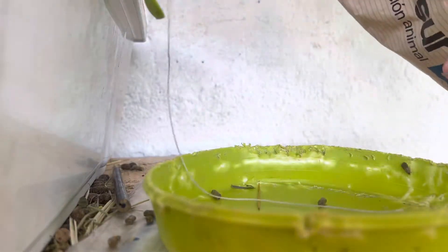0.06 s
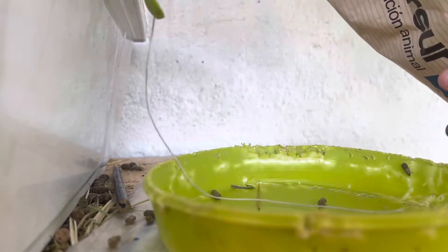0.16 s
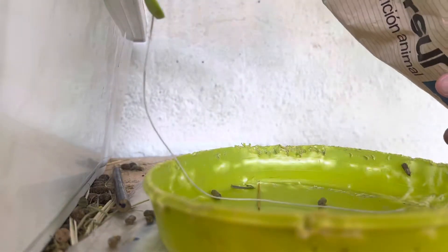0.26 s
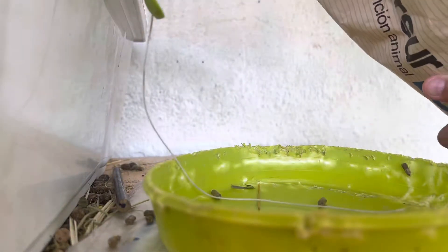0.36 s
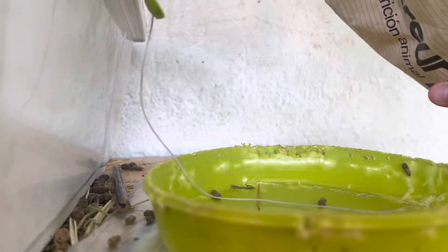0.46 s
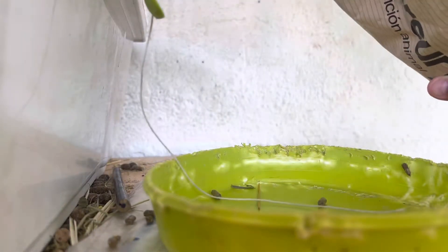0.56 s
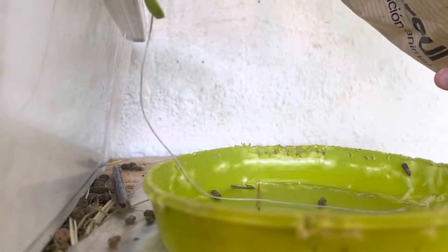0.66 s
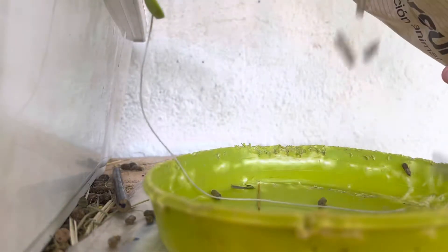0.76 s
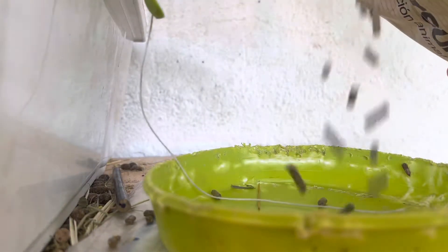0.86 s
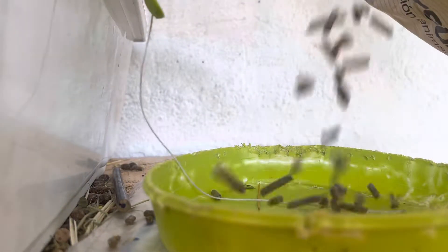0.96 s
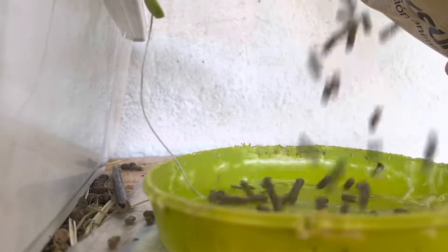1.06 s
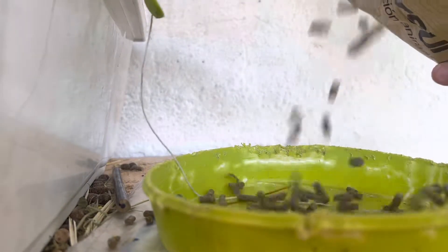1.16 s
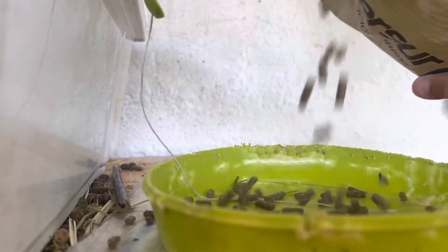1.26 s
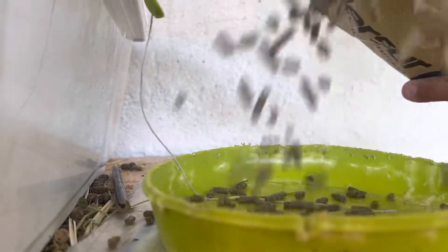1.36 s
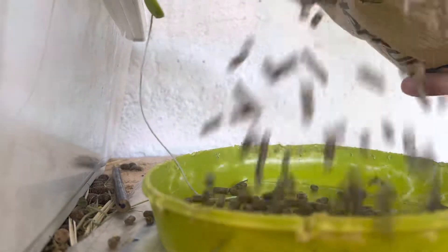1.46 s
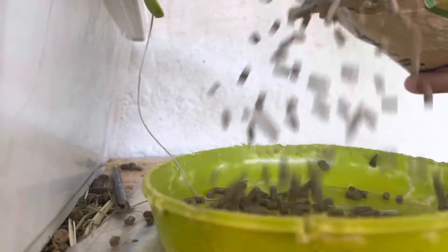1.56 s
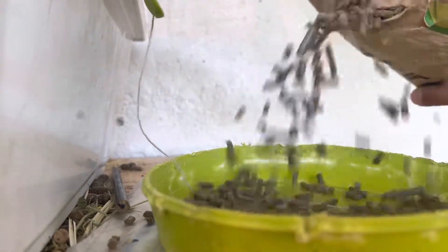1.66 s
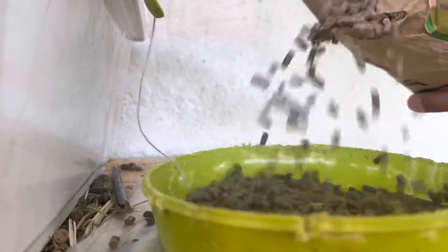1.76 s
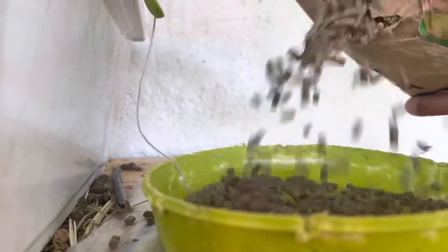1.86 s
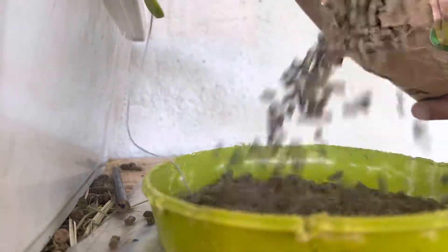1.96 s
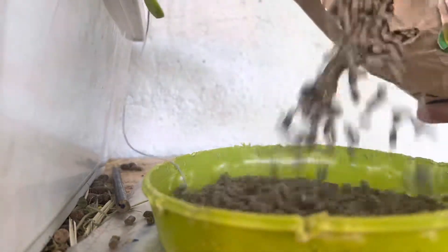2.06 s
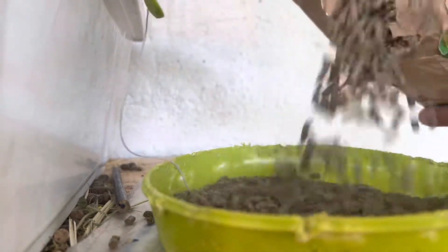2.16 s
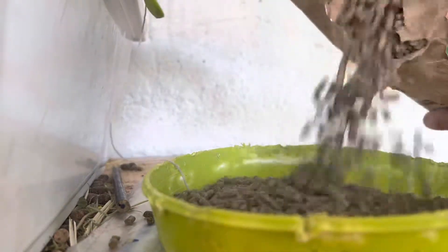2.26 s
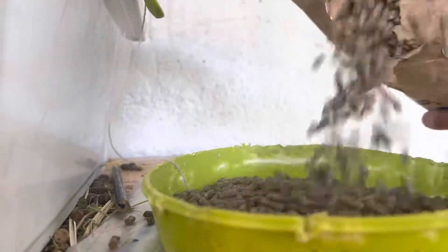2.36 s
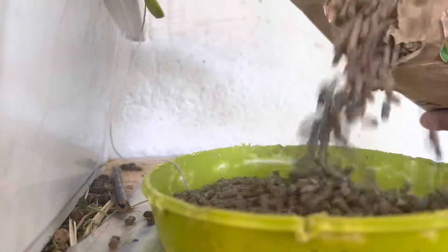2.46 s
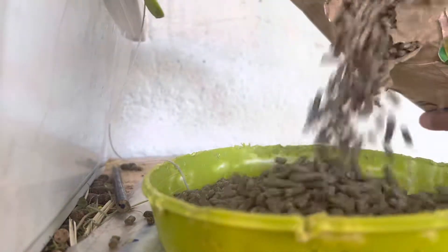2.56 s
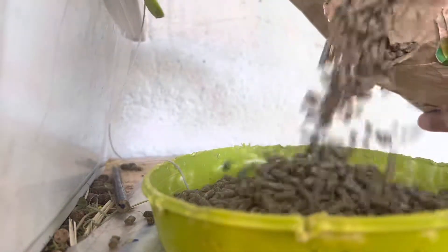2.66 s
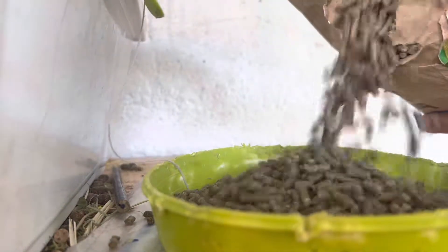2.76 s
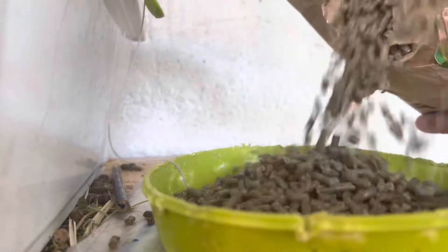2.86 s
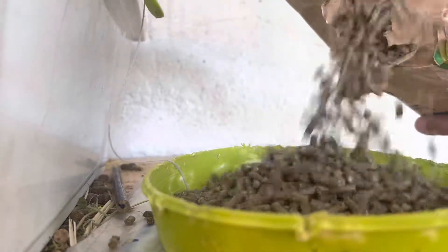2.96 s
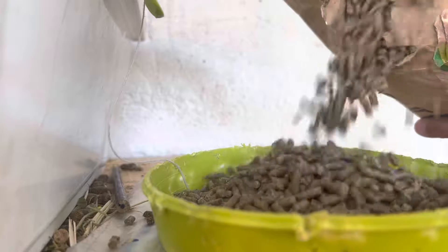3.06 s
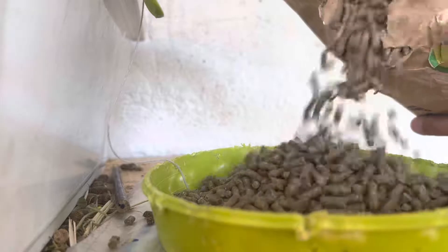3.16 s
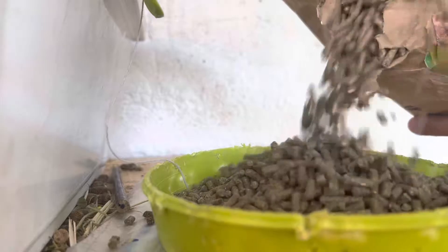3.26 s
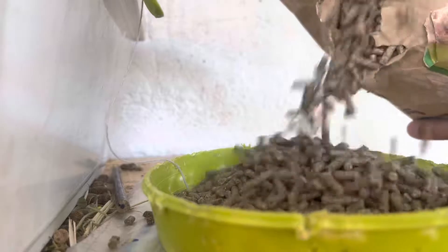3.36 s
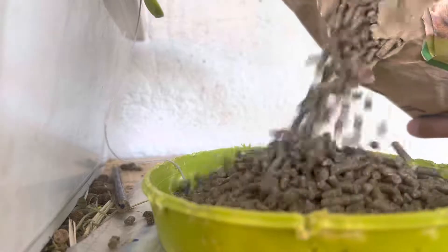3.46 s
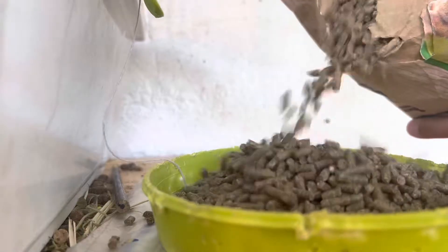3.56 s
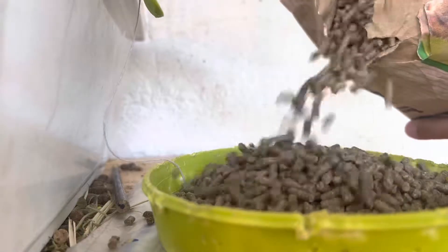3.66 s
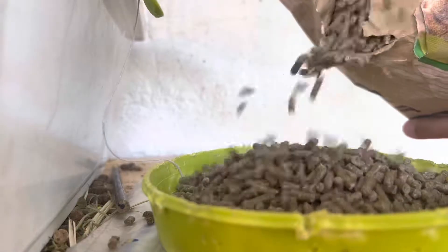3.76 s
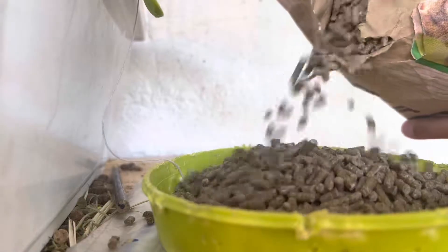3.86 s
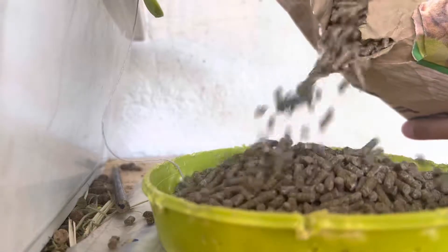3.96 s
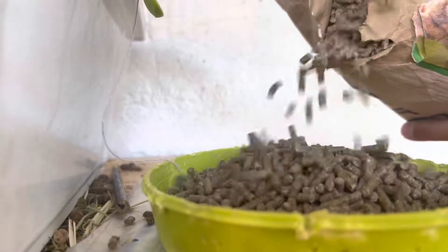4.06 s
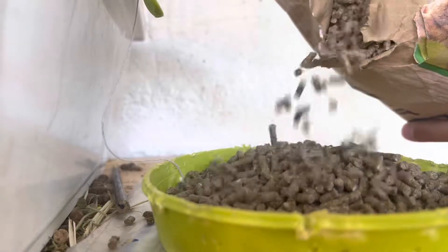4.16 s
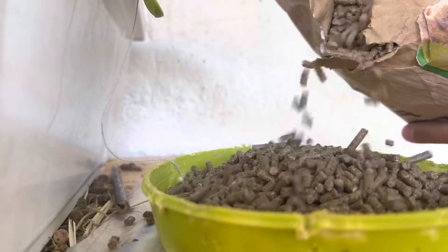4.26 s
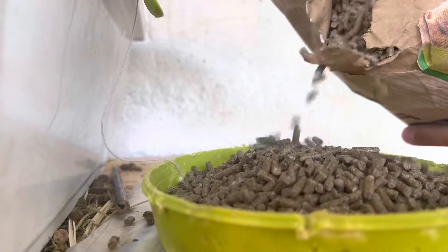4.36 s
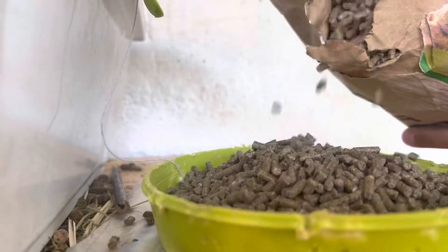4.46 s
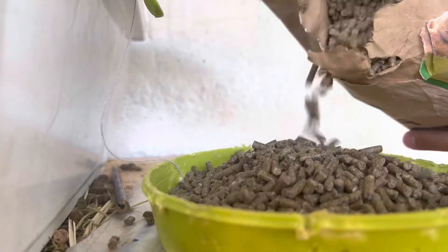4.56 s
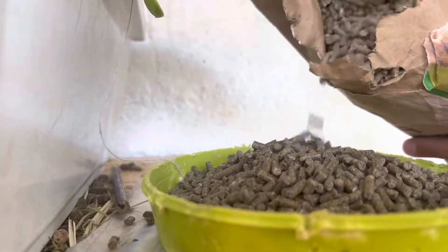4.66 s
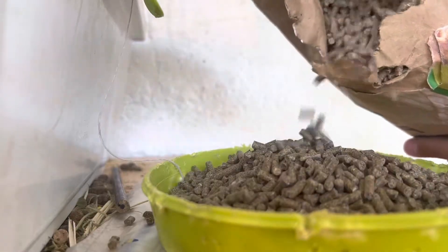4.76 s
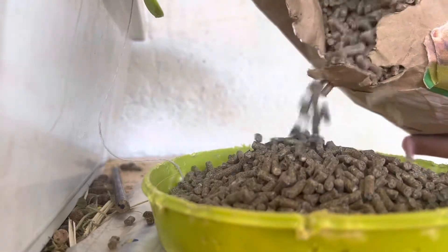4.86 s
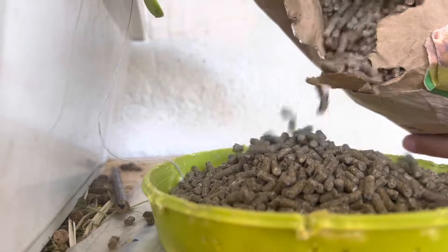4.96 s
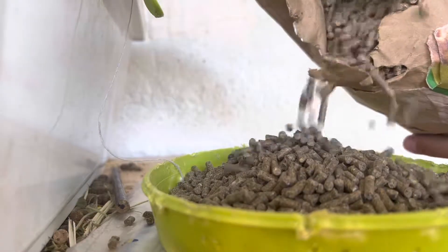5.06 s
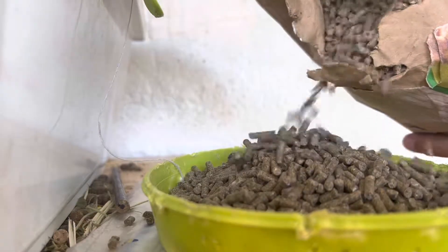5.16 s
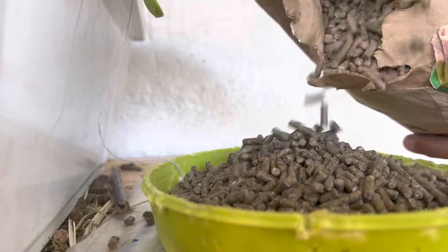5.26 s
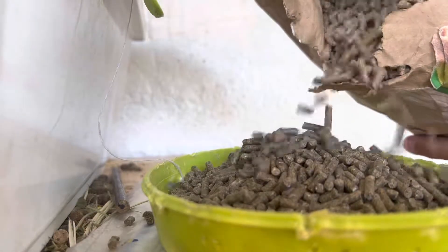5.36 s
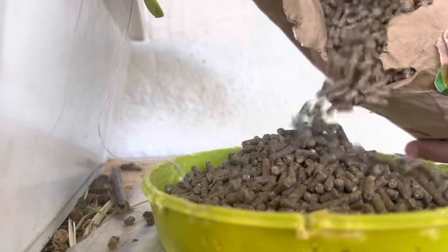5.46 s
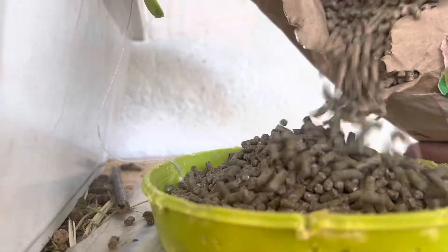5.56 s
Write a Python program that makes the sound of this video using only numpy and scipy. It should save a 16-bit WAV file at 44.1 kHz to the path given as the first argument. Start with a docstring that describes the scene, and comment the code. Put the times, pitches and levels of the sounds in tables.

```python
"""Dry feed pellets pour from a paper sack into a plastic bowl, heard close by in stereo.
Each impact is a shaped noise burst: ticks and ringing wall modes first, then duller knocks on the heap.
Loose pellets land hard on the plastic or click on the heap as the pour swells, thins and picks up again.
The sack crumples, rustles, snaps and creases; two hitches boom in its hollow through resonant modes.
Behind lie coloured noise for still air and a faint, slowly sinking sine hum."""
import sys
import numpy as np
from scipy import signal
from scipy.fft import rfft, irfft
from scipy.io import wavfile
from scipy.ndimage import uniform_filter1d

SR = 44100
rng = np.random.default_rng(int(sys.argv[2]) if len(sys.argv) > 2 else 0)


def transcribe(signal):
    """Save signal, clipped to [-1, 1], as a 16-bit WAV file at the path in sys.argv[1]."""
    frames = np.atleast_2d(signal).T
    limited = np.clip(frames, -1, 1)
    pcm = np.round(limited * 32767).astype(np.int16)
    wavfile.write(sys.argv[1], SR, pcm)


N = 247401

# Flow of the stream: time_s, collisions_per_s, level_db
FLOW = [(0.78, 190, -27), (0.93, 380, -13), (1.079, 474, -3), (1.6, 590, -4), (2.199, 710, -2),
        (3.4, 616, -1.1), (3.799, 420, -6), (4.15, 240, -11.5), (4.4, 220, -8.5), (4.748, 320, -13.5),
        (5.3, 490, -10.5), (5.61, 930, -8)]
# Clumps sliding off the sack's lip, and lulls: start_s, hold_s, change_db
CLUMPS = [(1.083, 0.024, 5), (1.121, 0.043, 3), (1.221, 0.011, 6), (1.253, 0.0079, 6.5),
          (1.27, 0.0087, -11), (1.358, 0.0072, -2.5), (1.385, 0.048, 3), (1.435, 0.078, 4.5),
          (1.522, 0.0076, -3.5), (1.546, 0.015, 7.5), (1.572, 0.054, 4.5), (1.626, 0.0061, 0),
          (1.641, 0.063, 4), (1.7, 0.047, 4), (1.754, 0.056, 2.5), (1.848, .011, -5), (1.916, 0.042, 3.5),
          (1.959, 0.021, 4), (2.003, 0.036, 2.5), (2.058, 0.0183, 2), (2.079, 0.045, 1.5),
          (2.121, 0.011, -5), (2.177, 0.062, 3.5), (2.239, 0.067, 2.5), (2.385, 0.071, 2),
          (2.523, 0.056, 2), (2.753, 0.029, 4), (3.642, 0.031, 6), (3.895, 0.093, 5.5)]
# Pellets striking the plastic hard: start_s, level_db (before the gains), wall_over_tick_db (before the gains)
HARD_HITS = [(0.7816, -3, -13), (0.794, 0.5, -0.5), (0.805, -7, 0), (0.827, -4, 4), (0.856, -2, 2.5),
             (0.869, -0.5, 2), (0.8797, 1.5, 1.5), (0.9033, -2, 3), (0.921, -12, 9), (0.9301, -1, -2),
             (0.9346, -1, -24), (0.9476, 0.5, -15), (0.977, 2, -17), (0.9838, 2, -8), (0.9953, -3, -0.5),
             (1.007, -8, 2), (1.0132, 0, 2), (1.019, 0.5, -1.5), (1.027, -13, 14), (1.0328, -3.5, 3),
             (1.047, -8, 6), (1.088, -5, 7), (1.115, -7.5, 6), (1.136, -10.5, 8), (1.1823, -7, -2),
             (1.1896, -6.5, 1), (1.221, 2, -14), (1.248, -7, 5), (1.2883, -3, -10), (1.2998, -3.5, 5.5),
             (1.332, -14, 2), (1.3476, 3.5, -8), (1.356, -2.5, -19), (1.395, -0.5, -2), (1.4167, -5, 4),
             (1.4462, -7, 5.5), (1.471, -2.5, -4), (1.552, -4.5, -3), (1.6275, -6, -9), (1.69, -7, -7),
             (1.733, -13, 11.5), (1.7858, -13, 10), (1.82, -10, 3), (1.8416, -14, 12), (1.8631, -4, 0.5),
             (1.8916, -0.5, -12), (1.9072, -1, -14), (1.917, -10, 5.5), (1.9657, -1, 1), (2.015, -8.5, 5.5),
             (2.0511, -11, 2), (2.1507, -10.5, 2), (2.166, -3, 0), (2.256, -13.5, 6), (2.2886, -9.5, 2),
             (3.616, -18.5, -1), (4.241, -20, 5), (4.293, -24, 2), (4.418, -23, 8.5), (4.473, -27, 1),
             (4.4897, -20, 0)]
# Single pellets clicking on the heap: start_s, level_db (before the gain), pitch_hz
HEAP_CLICKS = [(2.3542, -31, 2130), (2.3987, -29, 2930), (2.4317, -33, 2130), (2.4496, -30, 2160),
               (2.5692, -22, 2200), (2.6126, -33, 2210), (2.665, -24, 2820), (2.89, -30, 4560),
               (2.9802, -23, 3060), (3.019, -22, 11300), (3.0837, -23, 4870), (3.172, -25, 4800),
               (3.1975, -25, 3040), (3.363, -26, 5800), (3.471, -20.5, 4470), (3.671, -35, 4790),
               (3.684, -20, 4870), (3.8294, -25, 4470), (3.8722, -24, 4630), (3.933, -24.5, 5640),
               (4.0648, -26, 4950), (4.0857, -26.5, 4430), (4.1856, -29.5, 4950), (4.2928, -19, 2950),
               (4.356, -26.5, 3170), (4.3717, -32, 5270), (4.5255, -17, 3870), (4.586, -22.5, 2940),
               (5.0501, -24, 4330), (5.2176, -24, 2470), (5.415, -19.5, 5160), (5.453, -20.5, 4540)]
# Buckling folds of the sack: start_s, peak_db, pitch_hz, width_octaves
CREASES = [(0.084, -15.5, 595, 4.6), (0.119, -18, 570, 0.37), (0.1354, -12, 1700, 1),
           (0.1614, -8, 1570, 0.083), (0.175, -18, 594, 0.44), (0.182, -23.5, 275, 0.96),
           (0.207, -19, 1510, .4), (0.224, -18, 1200, 1.1), (0.276, -15, 3260, 0.2),
           (0.3096, -9.5, 860, 0.61), (0.352, -16, 556, 1.2), (0.369, -16.5, 1280, 0.15),
           (0.4178, -16, 394, 1.3), (0.43, -21, 1000, 0.74), (0.445, -19.5, 590, 1.1),
           (0.476, -20, 810, 0.32), (0.491, -20.5, 262, 0.37), (0.526, -20, 1800, 0.89),
           (0.557, -27, 440, 0.87), (0.583, -21.5, 1530, 0.23), (0.653, -28, 1300, 0.41),
           (0.692, -24, 1100, 0.86), (0.7213, -10, 710, 1.04), (0.8914, -11, 193, 1.3),
           (1.0608, -3, 940, 0.4), (1.127, -16, 517, 0.37), (1.366, -18, 277, 0.9), (2.186, -20, 480, 0.5),
           (3.708, -28.5, 606, 1.2), (4.011, -23.5, 1370, 0.46), (4.527, -18, 690, 1.6),
           (4.57, -19, 860, 0.3), (5.054, -20, 560, 0.54), (5.07, -27, 850, 1), (5.163, -28.5, 1098, 0.9),
           (5.203, -26.5, 515, 0.53)]
# Heavy jolts of the sack: start_s, peak_db, settled_pitch_hz, rise_s
JOLTS = [(0.894, -25, 62, 0.0078), (1.077, -28, 139, 0.011), (4.276, -33, 106, 0.01),
         (4.511, -21, 139, 0.0041), (4.533, -14, 165.5, 0.0064), (4.551, -23, 125, 0.0069),
         (4.589, -29.5, 267, .007), (4.612, -27, 62.5, 0.0099), (4.628, -29, 370, 0.0022),
         (4.662, -29, 131, 0.019), (5.055, -21, 310, 0.0023), (5.069, -27, 364, 0.0094),
         (5.085, -26.5, 60.3, 0.0088), (5.125, -37.5, 385, 0.0063), (5.205, -34, 142, 0.011)]
# Crisp snaps of the paper: start_s, level_db (before the gain)
SNAPS = [(0.053, -22), (0.137, -12.5), (0.164, -20), (0.181, -22.5), (0.231, -23), (0.244, -22.5),
         (0.2753, -24), (0.431, -24), (0.722, -20.5)]
# Hands flexing the sack: start_s, hold_s, crumple_db, rustle_db
FLEXES = [(-0.02, 0.26, -30.5, -38.5), (0.254, 0.17, -37, -43.5), (0.406, 0.11, -33, -38),
          (0.517, 0.33, -36, -40), (0.855, 0.69, -36, -30), (3.987, 0.082, -43, -46),
          (4.22, 0.1255, -44, -51), (4.433, 0.067, -41, -42.5), (4.508, .1, -36, -39.5),
          (5.049, .03, -34.5, -48), (5.181, 0.15, -43.5, -48), (5.487, 0.12, -46, -44.5)]
# Hitches of the sack that make its hollow boom: start_s, level_db
HITCHES = [(4.529, -27), (5.055, -34)]
# Modes of the bowl's wall before damping and spread: mode_hz, width_hz, level_db
WALL_MODES = [(1050, 104, -5), (1504, 74, 1), (1706, 120, 1), (2175, 126, -4), (2520, 570, -8.5),
              (2940, 44, 0), (3500, 340, -10), (4287, 48, 1), (4826, 116, -1.5)]
# Modes of the bowl's bottom: mode_hz, width_hz, level_db
BOTTOM_MODES = [(70, 26, -6), (191, 28.5, 2.5), (256, 33, -1), (476, 128, -10.5)]
# Modes of the sack's hollow: mode_hz, width_hz, level_db
SACK_MODES = [(72, 45, -14), (137, 24, 0.5), (177, 49, -4.5), (392, 58, -13), (475, 33, -10)]
# Spectrum of a pellet's tick: frequency_hz, density_db
TICK_SPECTRUM = [(100, -23), (400, -11.5), (700, -10), (1200, -1), (2200, 0.5), (3400, 0), (5200, 0),
                 (6300, -1), (7500, -8), (9200, -3), (11600, -4.5), (13200, -3.5), (15600, -9)]
# Spectrum of a knock on the heap: frequency_hz, density_db
HEAP_SPECTRUM = [(200, -28), (500, -16.5), (850, -0.5), (1400, -9), (1800, -2.5), (2150, 1.5), (2900, -8.5),
                 (4000, -2), (8000, -62)]
# Spectrum of crumpling: frequency_hz, density_db
CRUMPLE_SPECTRUM = [(30, -2), (80, -1.5), (200, 0.5), (450, 3), (800, -0.5), (1600, -0.5), (2200, -9.5),
                    (3000, -29), (8000, -46)]
# Spectrum of dry paper rustle: frequency_hz, density_db
PAPER_SPECTRUM = [(100, -14), (700, -15), (1600, 4), (2900, 2.5), (4500, 3), (6300, 0.5), (8000, -3.5),
                  (9500, 1.5), (11800, -4), (13500, -4), (15600, -10)]
# Spectrum of still air: frequency_hz, density_db
AIR_SPECTRUM = [(20, -51), (45, -1.5), (70, -2), (170, -7.5), (300, -12.5), (700, -12.5), (1600, -11.5),
                (4000, -28), (8000, -21.5), (16000, -24)]
# Low hum from far off: time_s, pitch_hz, level_db
HUM = [(3.0, 88.3, -67), (3.3, 87.8, -46.5), (3.7, 83.5, -51), (4.1, 81.3, -47.5), (4.5, 79, -45),
       (5.0, 75.3, -50.5), (5.4, 70, -55)]
# Left-right likeness of the microphone pair below the treble: frequency_hz, likeness (-1 to 1)
LIKENESS = [(60, .94), (200, .96), (330, .88), (500, .65), (750, .35), (1100, .7), (1650, .88), (2300, .72),
            (3000, .3), (3600, -.3), (4400, .3), (5600, -.15), (6500, .25), (7500, .25)]
# Level balance of the microphone pair: frequency_hz, left_minus_right_db
BALANCE = [(80, 0.5), (200, 0.5), (450, -1), (900, 1), (1400, 6), (2300, -0.5), (3500, 0), (5600, 6),
           (7500, 1.5), (9200, -1)]

# microphone pair and band limit
PORT_LAG_S, EDGE_HZ = 11.25 / 44100, 15900
# stream: levels before the flow, the heap and the load act on them
TICK_DB, WALL_DB, HEAP_DB, BOTTOM_DB = -18.5, -24, -24.5, -25.5
CUSHIONED_S, CUSHION_DB = (1.986, 2.69), -20.5  # the heap softens the ticks over this span
COVERED_S, COVER_DB = (2.04, 3.21), -18  # the heap buries the wall and dulls the knocks over this span
LOAD_S, LOAD_DB = 0.47, -8.5  # time in which the load grows by its first weight; level per doubling
BOTTOM_FOLLOW = 0.25  # dB change of the bottom per dB of flow
UNEVEN_DB, HEAP_UNEVEN_DB = -0.5, 2.5  # rms unevenness on bare plastic and on the heap
CLUMP_RISE_S, CLUMP_FALL_S = 0.0026, 0.0063
# pellets: pitches loose and bedded in the heap, and the ring at that pitch
PELLET_HZ, PELLET_SPREAD_OCTAVES = 4773, 1.307
HEAP_HZ, HEAP_SPREAD_OCTAVES = 1865, 0.803
PELLET_RING_DB, PELLET_OCTAVES = 9, .11
SLAP_S, SLAP_DB = .0025, -8  # the second end: lag before a random factor, and relative level
# place of impact: spread of mode level and frequency, before the variety factor
MODE_SPREAD_DB, MODE_SPREAD_HZ = 5, 49
# hard hits and clicks
HIT_TICK_DB, HIT_KNOCK_DB = 8.5, 6.5  # gains of a hit's two parts
CONTACT_HZ = 3840  # a hit lasts too long to drive the modes above this well
BRIGHT_SPREAD_DB = 1.8  # per octave, from hit to hit
CLICK_SKIRT_DB = -8  # per octave below a click's pitch, for two octaves
CLICK_RING_DB, CLICK_OCTAVES = 1, .35
# sack
FLEX_RISE_S, FLEX_FALL_S = 0.0037, 0.006
BOOM_RISE_S, BOOM_FALL_S = 0.0063, 0.14
SWAYING_S, SWAY_DB = (4.45, 5.61), -42  # between the jolts the sack keeps swaying
KNOCK_SAG = 0.27  # a knock starts this share above its settled pitch
FLEX_WARP_S = .003  # rms time shift of the hollow's sound


def amp(db):
    """Level law: 20 dB is a factor of ten in amplitude."""
    return 10 ** (np.asarray(db) / 20)


def evened(x):
    """Mean-square normalization: scales to rms 1."""
    return x / np.sqrt(np.mean(x ** 2) + 1e-20)


def read(points, hz):
    """Spectral interpolation on a logarithmic frequency axis."""
    f, value = np.transpose(points)
    return np.interp(np.log(hz + 1), np.log(f + 1), value)


def curves(rows):
    """Linear interpolation in time: every column of a table, sample by sample."""
    s, *columns = np.transpose(rows)
    return [np.interp(np.arange(N) / SR, s, column) for column in columns]


def during(start_s, end_s):
    """Gating: 1 between two times, with soft ends."""
    t = np.arange(N) / SR
    return uniform_filter1d(1. * ((t >= start_s) & (t <= end_s)), size=600)


def swell(s, hold_s, rise_s, fall_s):
    """Build-up and decay: a linear rise at time s, a hold and an exponential fall."""
    t = np.arange(N) / SR - s
    return np.clip(t / rise_s, 0, 1) * np.exp(-np.clip((t - hold_s) / fall_s, 0, 20))


def add(mix, s, sound):
    """Superposition: adds a stereo sound in place at time s."""
    part = mix[:, max(round(s * SR), 0):][:, :sound.shape[1]]
    part += sound[:, :part.shape[1]]


def bins(size=8192):
    """Discrete spectrum: the frequencies on which short sounds are built."""
    return np.fft.rfftfreq(size, 1 / SR)


def causal(db):
    """Minimum phase: the gain in dB alone fixes the phase, through the Hilbert transform."""
    log_gain = np.log(amp(np.maximum(db, db.max() - 101)))
    mirrored = np.r_[log_gain, log_gain[-2:0:-1]]
    return np.exp(signal.hilbert(mirrored).conj()[:len(db)])


def hump(hz, octaves):
    """Single resonance in dB, its upper skirt steepening far from the centre."""
    away = np.log2((bins() + 1) / hz)
    return -10 * np.log10(1 + (2 * away / octaves) ** 2) - 2 * np.maximum(away, 0) ** 2


def body(modes):
    """Modal superposition: steep-skirted resonances of alternating sign."""
    f = bins() + 1
    response = 0
    for k, (hz, width, db) in enumerate(modes):
        detuning = (f * f - hz * hz) / (f * 2 * width)
        response = response + (-1) ** k * amp(db) / (1 + 1j * detuning) ** 2
    return response


def ports(z, hz, far_share=.2, treble_likeness=.96):
    """Interaural-style coherence: two unrelated spectra become left and right, treble mostly from the right."""
    turn = np.exp(2j * np.pi * hz * PORT_LAG_S)
    treble = np.clip((hz - 7400) / 1800, 0, 1)
    crossing = min(treble_likeness, 1) * ((1 - far_share) * turn + far_share / turn)
    same = (1 - treble) * np.clip(read(LIKENESS, hz), -1, 1) + treble * crossing
    unlike = np.sqrt(np.maximum(1 - abs(same) ** 2, 0))
    lean = amp(read(BALANCE, hz) / 2)
    return np.array([z[0] * lean, (same * z[0] + unlike * z[1]) / lean])


def strike(colour, decay_s, lag_cycles, echo_db, push=0, echo_s=0.017, dull_hz=6000):
    """Dispersive impact of energy 1: push, burst and duller wall echoes; bending waves bring treble first."""
    hz = bins()
    t = np.arange(2 * len(hz) - 2) / SR
    near, far = rng.standard_normal((2, 2, len(t)))
    burst = near * np.sqrt(t / decay_s) * np.exp(-t / decay_s)
    burst[0, 0] += push * np.linalg.norm(burst[0])
    echoes = far * (np.exp(-t / echo_s) - np.exp(-4 * t / echo_s))
    echoes *= amp(echo_db) * np.linalg.norm(burst) / np.linalg.norm(echoes)
    bending = np.exp(-2j * np.pi * lag_cycles * np.log(hz + 100))
    source = rfft(burst) + rfft(echoes) / (1 + 1j * hz / dull_hz)
    sound = irfft(ports(source, hz) * colour * bending)
    return sound / np.sqrt(np.sum(sound ** 2) / 2)


def collisions(per_s, spread_db, count=16):
    """Random point process: uneven impulses of steady mean power, dealt out to several kinds of contact."""
    size = amp(spread_db * np.minimum(rng.exponential(1, N), 3.5)) * (rng.random(N) < per_s / SR)
    power = uniform_filter1d(uniform_filter1d(size ** 2, size=1800), size=1800)
    kind = rng.integers(0, count, N) == np.arange(count)[:, None]
    return size / np.sqrt(np.maximum(power, 1e-4)) * kind


def shower(trains, level, colour, decay_s, lag_cycles, echo_db, variety_db=0):
    """Convolution of impulses with contacts: each train has its own sound, with a varied colour if asked."""
    out = np.zeros((2, N))
    octave = np.log2(bins() / 4000 + .2)
    first, last = np.flatnonzero(trains.sum(0) * level > 1e-6)[[0, -1]]
    for train, tone in zip(trains, np.broadcast_to(colour, (len(trains), len(octave)))):
        own = amp(variety_db * np.sin(2 * octave + 2 * np.pi * rng.random()))
        contact = strike(tone * own, decay_s, lag_cycles, echo_db)[:, :4096]
        impulses = (train * level)[None, first:last + 1]
        add(out, first / SR, signal.oaconvolve(impulses, contact, axes=1))
    return out


def still_air():
    """Stationary noise: random spectra take the colour and stereo likeness of still air."""
    hz = np.fft.rfftfreq(N, 1 / SR)
    noise = ports(rfft(rng.standard_normal((2, N))), hz)
    return amp(-46.5) * evened(irfft(noise * amp(read(AIR_SPECTRUM, hz)), N))


def distant_hum():
    """Phase accumulation: a sine of slowly sinking pitch, equal in both channels."""
    hum_hz, hum_db = curves(HUM)
    return np.sqrt(2) * amp(hum_db) * np.sin(2 * np.pi * np.cumsum(hum_hz) / SR)


def paper_flexing():
    """Crackling noise: stiff paper crumples in many small folds, rustles and snaps."""
    crumple, rustle = sum(
        amp(dbs)[:, None] * swell(s, hold_s, FLEX_RISE_S, FLEX_FALL_S) for s, hold_s, *dbs in FLEXES)
    paper = causal(read(PAPER_SPECTRUM, bins()))
    trains = collisions(320, spread_db=2, count=12)
    folds = [causal(read(CRUMPLE_SPECTRUM, bins()) + hump(hz, 1) * .7)
             for hz in np.linspace(90, 1700, len(trains))]
    out = shower(trains, crumple, folds, decay_s=0.00024, lag_cycles=1.2, echo_db=-8)
    trains = collisions(1500, spread_db=3.0, count=8)
    out += shower(trains, rustle, paper, decay_s=0.0011, lag_cycles=0.263, echo_db=-5)
    for s, db in SNAPS:
        snap = strike(paper, decay_s=0.0018, lag_cycles=0.34, echo_db=-25)
        add(out, s, amp(db + 16.0) * snap)
    return out


def buckling_folds():
    """Snap-through buckling: each fold gives a resonant plop, dispersed so that it falls."""
    out = np.zeros((2, N))
    for s, db, hz, octaves in CREASES:
        plop = strike(causal(hump(hz, octaves)), decay_s=0.0014, lag_cycles=1.5, echo_db=-15, push=2)
        add(out, s, amp(db) * plop / abs(plop).max())
    return out


def knock(hz, rise_s):
    """Damped oscillation: a jolted slack panel swings a few times, sagging in pitch as the paper gives."""
    age = np.arange(SR // 4) / SR / rise_s
    turns = np.cumsum(hz * (1 + KNOCK_SAG * np.exp(-age))) / SR
    return np.tile(age * np.exp(1 - age) * np.sin(2 * np.pi * turns), (2, 1))


def sack_jolts():
    """Panel excitation: each heavy jolt of the sack sets off one dull knock."""
    out = np.zeros((2, N))
    for s, db, hz, rise_s in JOLTS:
        add(out, s, amp(db) * knock(hz, rise_s))
    return out


def flexed(sound):
    """Frequency modulation by varying delay: the sack changes shape, so its hollow's pitch wanders."""
    t = np.arange(N) / SR
    rates_hz = np.geomspace(1.5, 5, 6)
    wander = evened(sum(np.sin(2 * np.pi * (hz * t + rng.random())) / hz for hz in rates_hz))
    return np.array([np.interp(t + FLEX_WARP_S * wander, t, side) for side in sound])


def hollow_boom():
    """Cavity resonance: hitches and gentle swaying drive the modes of the sack's hollow."""
    booms = [amp(db) * swell(s, 0, BOOM_RISE_S, BOOM_FALL_S) for s, db in HITCHES]
    drive = np.max([amp(SWAY_DB) * during(*SWAYING_S), *booms], axis=0)
    trains = collisions(900, spread_db=-0.5, count=8)
    boom = shower(trains, drive, body(SACK_MODES), decay_s=0.0002, lag_cycles=0.308, echo_db=-41)
    return flexed(boom)


def heap_clicks():
    """Double impact: each pellet clicks on the heap end by end and rings briefly at its own pitch."""
    out = np.zeros((2, N))
    tick = read(TICK_SPECTRUM, bins())
    for s, db, hz in HEAP_CLICKS:
        below = np.clip(np.log2(hz / (bins() + 1)), 0, 2)
        ring = 1 + amp(CLICK_RING_DB) * causal(hump(hz, CLICK_OCTAVES))
        colour = causal(tick + CLICK_SKIRT_DB * below) * ring
        for late_s, end_db in [(0, db), (SLAP_S * rng.uniform(1, 2), db + SLAP_DB)]:
            click = strike(colour, decay_s=.001, lag_cycles=.9, echo_db=-10)
            add(out, s + 0.00075 + late_s, amp(end_db + 17.5) * click)
    return out


def pellet(pitch_hz, spread_octaves):
    """Free vibration: a short dry ring whose pitch depends on the pellet's length, drawn at random."""
    hz = pitch_hz * 2 ** (spread_octaves * rng.uniform(-0.979, 1))
    return 1 + amp(PELLET_RING_DB) * causal(hump(hz, PELLET_OCTAVES))


def wall_spot(damping, variety):
    """Modal participation: the place of impact favours some wall modes and shifts them a little."""
    spread = [MODE_SPREAD_HZ, 0, MODE_SPREAD_DB]
    shifts = variety * rng.standard_normal((len(WALL_MODES), 3)) * spread
    return body(np.array(WALL_MODES) * [1, damping, 1] + shifts)


def hard_hits():
    """Finite contact time: a pellet clacks and knocks the wall; its other end slaps down just after."""
    out = np.zeros((2, N))
    for s, db, ring_db in HARD_HITS:
        bright_db = 0.51 + BRIGHT_SPREAD_DB * rng.standard_normal()
        colour = causal(read(TICK_SPECTRUM, bins()) + bright_db * np.log2(bins() / 5000 + 0.076))
        # the pellet damps the wall while it touches
        wall = wall_spot(damping=1.42, variety=0.51) / (1 + 1j * bins() / CONTACT_HZ) ** 2
        for late_s, end_db in [(0, db), (SLAP_S * rng.uniform(0.513, 2), db + SLAP_DB)]:
            tick = amp(end_db + HIT_TICK_DB) * strike(colour, decay_s=.0007, lag_cycles=.6, echo_db=-13)
            wall_knock = strike(wall, decay_s=.0004, lag_cycles=.4, echo_db=-13, push=1.8)
            add(out, s + .0005 + late_s, tick + amp(end_db + ring_db + HIT_KNOCK_DB) * wall_knock)
    return out


def pellet_stream():
    """Granular impact noise: clumped pellets clack and ring the bowl until the heap covers its wall."""
    t = np.arange(N) / SR
    per_s, level_db = curves(FLOW)
    start_s, end_s = FLOW[0][0], FLOW[-1][0]
    pouring = during(start_s, end_s)
    cushioned = np.interp(t, CUSHIONED_S, [0, 1])
    covered = np.interp(t, COVERED_S, [0, 1])
    load = 1 + np.maximum(t - start_s, 0) / LOAD_S
    knock_db = level_db + COVER_DB * covered

    surge = amp(sum(db * swell(s, hold_s, CLUMP_RISE_S, CLUMP_FALL_S) for s, hold_s, db in CLUMPS))
    uneven = evened(uniform_filter1d(uniform_filter1d(rng.standard_normal(N), size=600), size=300))
    uneven_db = UNEVEN_DB + (HEAP_UNEVEN_DB - UNEVEN_DB) * covered
    trains = collisions(np.maximum(per_s, 50) * surge, spread_db=3.9, count=20) * pouring
    trains = trains * surge * amp(uneven * uneven_db)

    contact = dict(decay_s=.0009, lag_cycles=.8, echo_db=-8)
    tick_rings = [pellet(PELLET_HZ, PELLET_SPREAD_OCTAVES) for _ in trains]
    tick_colours = causal(read(TICK_SPECTRUM, bins())) * tick_rings
    heap_rings = [pellet(HEAP_HZ, HEAP_SPREAD_OCTAVES) for _ in trains]
    heap_colours = causal(read(HEAP_SPECTRUM, bins())) * heap_rings
    wall_colours = [wall_spot(damping=0.75, variety=0.81) for _ in trains]
    ticks = shower(trains, amp(TICK_DB + level_db + CUSHION_DB * cushioned), tick_colours, **contact)
    wall = shower(trains, amp(WALL_DB + knock_db) * (1 - covered), wall_colours, **contact)
    heap_level = amp(HEAP_DB + knock_db) * np.sqrt(covered)
    heap = shower(trains, heap_level, heap_colours, variety_db=2.0, **contact)

    # the bottom feels the whole stream at once, without its clumps
    weight = collisions(600, spread_db=0.0, count=4) * pouring
    bottom_level = amp(BOTTOM_DB + BOTTOM_FOLLOW * level_db + LOAD_DB * np.log2(load))
    bottom = shower(weight, bottom_level, body(BOTTOM_MODES), decay_s=0.0009, lag_cycles=1.5, echo_db=-5.5)
    return ticks + wall + heap + bottom


def scene():
    """Linear superposition of the background, the sack and the pellets."""
    background = still_air() + distant_hum()
    sack = paper_flexing() + buckling_folds() + sack_jolts() + hollow_boom()
    pellets = heap_clicks() + hard_hits() + pellet_stream()
    return background + sack + pellets


def record(dry):
    """Saturation and band limiting: loud peaks are rounded off, then bass and top treble are cut."""
    rounded = dry / (1 + (dry / .8) ** 4) ** .25
    bass_cut = signal.butter(2, 38, "highpass", fs=SR, output="sos")
    thinned = signal.sosfilt(bass_cut, rounded)
    band_limit = signal.firwin(401, EDGE_HZ, window=("kaiser", 8), fs=SR)
    return signal.oaconvolve(thinned, band_limit[None], "same")


dry = scene()
out = record(dry)
transcribe(out)
```